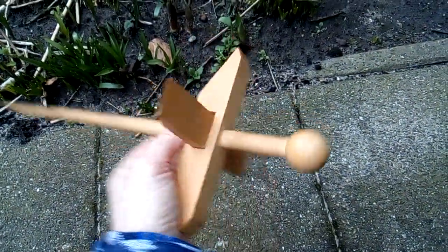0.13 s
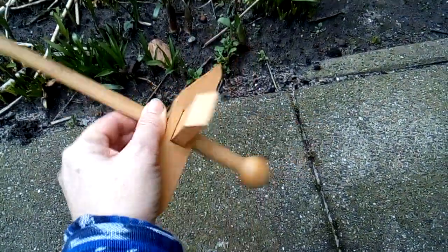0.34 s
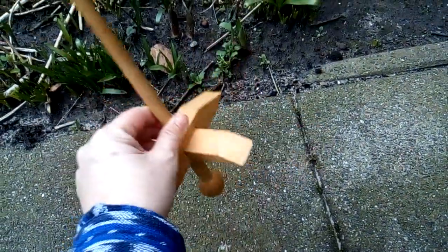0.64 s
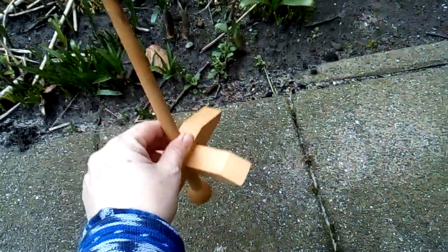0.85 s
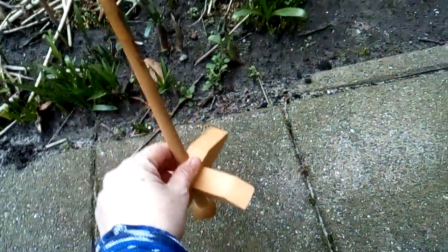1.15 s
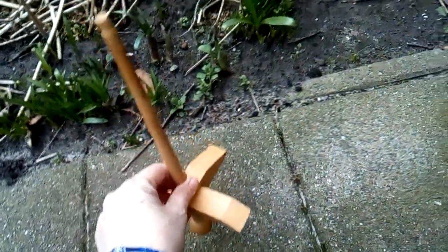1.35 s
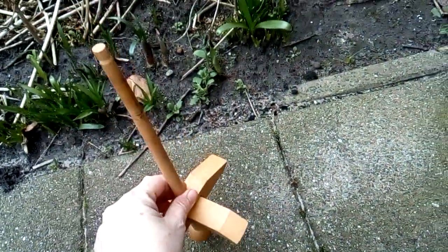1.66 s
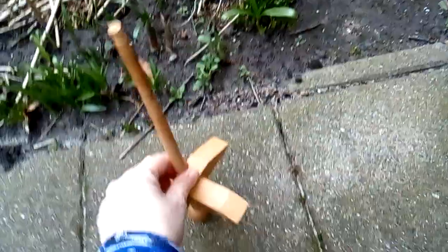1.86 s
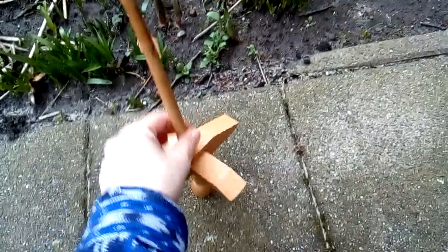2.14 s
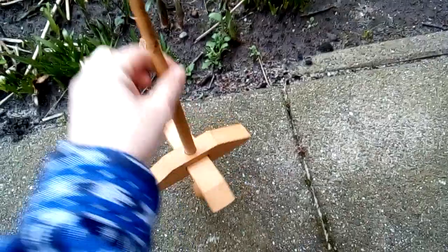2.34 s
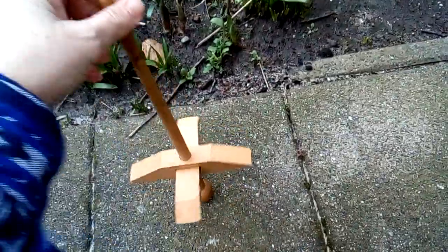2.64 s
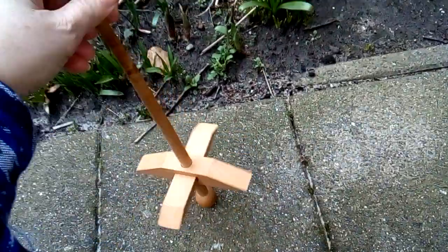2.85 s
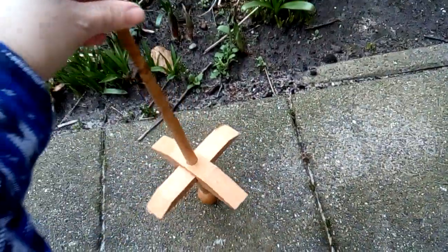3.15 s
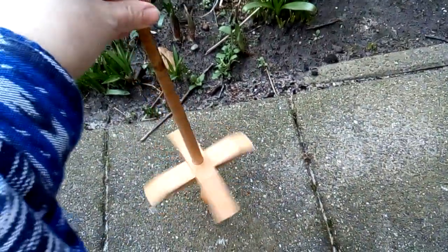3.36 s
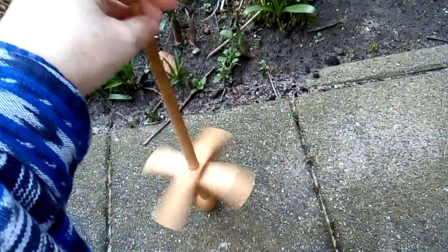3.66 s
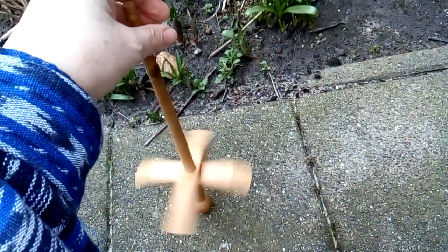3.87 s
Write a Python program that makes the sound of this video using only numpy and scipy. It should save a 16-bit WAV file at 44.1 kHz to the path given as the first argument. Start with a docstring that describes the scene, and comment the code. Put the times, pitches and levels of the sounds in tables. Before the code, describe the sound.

Dry wooden knock on a stone slab, thin finger squeaks after, wind buffeting the microphone

```python
"""Quiet garden air, band-swayed noise, under gusts: two noise bands buffeting the microphone.
At once a far bird whistles, a gliding tone with echoes, and adds two faint peeps.
Near 1.9 s a wooden spindle is set down on a paving slab: decaying modes and grit noise, one small bounce.
Then a hand slides up its shaft and twirls it: filtered friction noise and thin, jittering squeaks.
The gusts are strongest in the last second."""
import sys
import numpy as np
from scipy import signal
from scipy.fft import rfft, irfft
from scipy.io import wavfile
from scipy.ndimage import uniform_filter1d

SR = 44100
rng = np.random.default_rng(int(sys.argv[2]) if len(sys.argv) > 2 else 0)


def put_to_file(sound):
    """Save the sound as 16-bit audio at rate SR, in the file named by the first command-line argument."""
    columns = np.atleast_2d(sound).T  # one column per channel
    safe = np.clip(columns, -1, 1)
    whole_steps = np.round(safe * 32767)
    wavfile.write(sys.argv[1], SR, whole_steps.astype(np.int16))


N = 176400  # samples


def undb(db):
    """Amplitude ratio of a level in dB."""
    return 10 ** (np.asarray(db) / 20)


def unit(x):
    """Scale to rms 1."""
    return x / np.sqrt(np.mean(x ** 2))


def clock():
    """Time of each sample [s]."""
    return np.arange(N) / SR


def curve(table):
    """Each column after the time, joined by straight lines."""
    rows = np.array(table, float).T
    return [np.interp(clock(), rows[0], column) for column in rows[1:]]


def noise(colour):
    """Gaussian noise of rms 1, shaped by a colour table over log frequency."""
    table_hz, table_db = np.array(colour, float).T
    f_hz = np.maximum(np.fft.rfftfreq(N, 1 / SR), 1)
    gain = undb(np.interp(np.log(f_hz), np.log(table_hz), table_db))
    return unit(irfft(rfft(rng.standard_normal(N)) * gain, N))


def wander(rate_hz):
    """Smooth random curve of rms 1: noise under a Gaussian low-pass."""
    steps = N // 32
    f_hz = np.fft.rfftfreq(steps, N / SR / steps)
    slow = irfft(rfft(rng.standard_normal(steps)) * np.exp(-(f_hz / rate_hz) ** 2), steps)
    return np.interp(np.arange(N), np.linspace(0, N, steps), unit(slow))


def fade(t60_s):
    """Exponential decay from time zero, 60 dB in t60_s."""
    return np.exp(-np.log(1000) * clock() / t60_s)


def convolve(x, response):
    """Pass x through an impulse response, cut to N samples."""
    return signal.fftconvolve(x, response)[:N]


STEADY_S, STEADINESS = 0.074, 0.56  # power window; share of its swing removed, in dB


def eddies(colour):
    """Turbulence as coloured noise, its strength partly evened out."""
    x = noise(colour)
    power = uniform_filter1d(np.abs(signal.hilbert(x)) ** 2, int(STEADY_S * SR))
    return unit(x / power ** (STEADINESS / 2))


# gust strength before the trims: (time [s], deep rumble level [dB], flutter level [dB])
GUST_LEVELS = [(0.0, -70.5, -57), (0.058, -59, -64), (0.192, -56, -60.5), (0.218, -68, -68),
               (0.368, -55, -60), (0.496, -64.5, -65), (0.688, -55.5, -60), (0.934, -64, -58),
               (1.106, -59.5, -75), (1.164, -56.5, -59.5), (1.326, -65.5, -66.5), (1.39, -49, -52),
               (1.512, -44, -45), (1.92, -60.5, -59), (1.97, -58, -59), (2.08, -53, -54.5), (2.1, -62, -91),
               (2.13, -54, -87), (2.19, -75, -63), (2.28, -53.5, -77), (2.31, -57, -62.5), (2.57, -59, -57),
               (2.59, -51, -54.5), (2.72, -65, -63.5), (2.78, -53.5, -55.5), (2.9, -54.5, -53),
               (2.94, -39.5, -44.5), (3.08, -42, -52), (3.13, -38, -46.5), (3.18, -40.5, -52),
               (3.21, -52.5, -58.5), (3.29, -39, -50), (3.34, -52.5, -52), (3.39, -41, -60),
               (3.47, -29.5, -52.5), (3.52, -57, -55.5), (3.54, -46.5, -53), (3.58, -42.5, -67),
               (3.61, -56, -60), (3.63, -48, -66), (3.65, -30, -35.5), (3.7, -25.5, -32.5),
               (3.74, -39, -58), (3.8, -38, -58), (3.84, -34, -46), (3.96, -29, -38), (3.97, -46.5, -69),
               (3.99, -23.5, -55)]
# relative spectrum of the large eddies: (frequency [Hz], level [dB])
RUMBLE_COLOUR = [(15, -54.5), (28, -24), (40, -7), (58, -1), (82, 2), (125, -3), (170, -15.5), (260, -41.5),
                 (500, -88)]
# relative spectrum of the smaller eddies: (frequency [Hz], level [dB])
FLUTTER_COLOUR = [(80, -25.5), (160, 3), (215, 0.5), (300, -6.5), (370, -18.5), (460, -38.5), (700, -48.5),
                  (1500, -80)]
RUMBLE_TRIM_DB, FLUTTER_TRIM_DB = 1, 1


def wind():
    """Gusts buffet the microphone with large, deep eddies and smaller, fluttering ones."""
    deep_db, light_db = curve(GUST_LEVELS)
    rumble = eddies(RUMBLE_COLOUR) * undb(deep_db + RUMBLE_TRIM_DB)
    flutter = eddies(FLUTTER_COLOUR) * undb(light_db + FLUTTER_TRIM_DB)
    return rumble + flutter


# relative spectrum of garden air with microphone hiss: (frequency [Hz], level [dB])
AIR_COLOUR = [(30, -15), (150, -6.5), (320, 15.5), (400, 5.5), (480, -0.5), (600, -2), (900, 0.5),
              (1400, -6), (2000, -5.5), (3000, -12.5), (4500, -12.5), (6700, -18), (8000, -26),
              (13500, -26.5), (15300, -20), (16000, -30)]
# strength of the air: (time [s], level [dB])
AIR_LEVELS = [(0, -69), (.8, -69), (1.2, -69), (2.4, -68.5), (4, -71.5)]
SWAY_EDGES_HZ = np.geomspace(250, 6000, num=38)
SWAY_RMS_DB, SWAY_RATE_HZ = 2.1, 9


def air():
    """Outdoor hush: narrow bands swell and fade independently; hiss above 6 kHz does not sway."""
    hush = noise(AIR_COLOUR)
    spectrum, f_hz = rfft(hush), np.fft.rfftfreq(N, 1 / SR)
    for lo_hz, hi_hz in zip(SWAY_EDGES_HZ, SWAY_EDGES_HZ[1:]):
        band = irfft(spectrum * ((f_hz >= lo_hz) & (f_hz < hi_hz)), N)
        sway = unit(undb(SWAY_RMS_DB * wander(SWAY_RATE_HZ)))
        hush = hush + band * (sway - 1)
    return hush * undb(curve(AIR_LEVELS)[0])


SQUEAL_EDGE_S, SQUEAL_FLUTTER_RMS_DB, OCTAVE_DB = 0.014, 4, -22.5


def squeal(start_s, length_s, pitch_hz, level_db, jitter_share):
    """Short tone of jittering pitch and level, with a weak octave."""
    t = clock() - start_s
    # start and length mark the half-gain points
    gate = np.clip(np.minimum(t, length_s - t) / SQUEAL_EDGE_S + .5, 0, 1)
    phase = 2 * np.pi * np.cumsum(pitch_hz * (1 + jitter_share * wander(200))) / SR
    tone = unit(np.sin(phase) + undb(OCTAVE_DB) * np.sin(2 * phase))
    return gate * tone * undb(level_db + SQUEAL_FLUTTER_RMS_DB * wander(99))


# far bird's whistle before jitter: (time [s], pitch [Hz], level [dB])
WHISTLE_TRACK = [(0, 2090, -70), (.055, 2055, -72.5), (.086, 2124, -80.5), (.16, 2225, -68.5),
                 (.26, 2215, -74.5), (.31, 2050, -73.5), (.37, 1926, -78.5), (.43, 1970, -92)]
# bird's faint peeps: (time [s], length [s], pitch [Hz], level [dB], rms pitch jitter [share])
PEEP_TONES = [(0.574, 0.016, 3210, -72.5, 0.015), (.64, 0.12, 2240, -85, 0.011)]
WHISTLE_JITTER_SHARE, WHISTLE_FLUTTER_RMS_DB = .016, 3.8
BIRD_ECHO_DB, BIRD_ECHO_T60_S = -4, 0.45


def bird():
    """A far whistle arches and falls, then two peeps, all blurred by a decaying noise echo."""
    pitch_hz, level_db = curve(WHISTLE_TRACK)
    jittered_hz = pitch_hz * (1 + WHISTLE_JITTER_SHARE * wander(160))
    tone = unit(np.sin(2 * np.pi * np.cumsum(jittered_hz) / SR))
    sounding = clock() < WHISTLE_TRACK[-1][0]
    whistle = tone * undb(level_db + WHISTLE_FLUTTER_RMS_DB * wander(45)) * sounding
    song = whistle + sum(squeal(*row) for row in PEEP_TONES)
    echo = rng.standard_normal(N) * fade(BIRD_ECHO_T60_S)
    return song + undb(BIRD_ECHO_DB) * convolve(song, echo / np.linalg.norm(echo))


# spindle on slab: (time [s], level re first blow [dB], contact decay constant [s])
BLOWS = [(1.9401, 0, .00003), (1.9505, -13, .00005)]
# relative modes of the struck spindle: (frequency [Hz], level [dB], t60 [s])
SPINDLE_MODES = [(343, -5, 0.021), (714, 0, 0.013), (925, 4, 0.01), (1200, -4.5, 0.018),
                 (1540, -8.5, 0.012), (2035, -3, 0.018), (2420, -9.5, 0.015), (2820, -8, 0.02),
                 (3220, -32, 0.052), (3630, -27.5, 0.089), (4230, -41, 0.095), (5900, -14, 0.022),
                 (6680, -32, 0.037), (15100, -10, .009)]
# relative spectrum of grit and yard echo: (frequency [Hz], level [dB])
GRIT_COLOUR = [(30, -33), (150, -1), (380, 7.5), (600, -12), (950, -8), (1500, -11), (2600, -13),
               (4200, -35), (6800, -27), (8000, -46), (16000, -52)]
KNOCK_DB, ATTACK_S = -21.5, .0004
CRACK_DB, CRACK_T60_S = -18, .018  # re KNOCK_DB
YARD_DB, YARD_T60_S = -25, 0.15  # re KNOCK_DB


def knocks():
    """Each blow rings the hand-damped wood, cracks on the grit and echoes faintly in the yard."""
    t, out = clock(), np.zeros(N)
    rise = 1 - np.exp(-(t / ATTACK_S) ** 2)
    ring = np.zeros(N)
    for k, (hz, db, t60_s) in enumerate(SPINDLE_MODES):
        sign = (-1) ** k  # neighbouring modes swing opposite ways
        ring += sign * rise * undb(db) * fade(t60_s) * np.sin(2 * np.pi * hz * t)
    ring = ring / np.abs(ring).max()
    for start_s, db, contact_s in BLOWS:
        push = np.exp(-t / contact_s)
        wood = convolve(ring, push / push.sum())
        decay = undb(CRACK_DB) * fade(CRACK_T60_S) + undb(YARD_DB) * fade(YARD_T60_S)
        grit = rise * noise(GRIT_COLOUR) * decay
        at = int(start_s * SR)
        out[at:] += undb(KNOCK_DB + db) * (wood + grit)[:N - at]
    return out


# relative resonances of the rubbed shaft: (frequency [Hz], half-width at -6 dB [Hz], level [dB])
SHAFT_MODES = [(3135, 130, -4.5), (3760, 190, -11.5), (4870, 110, -4), (5200, 69, -18.5), (5800, 57, 1.5),
               (6920, 330, -6), (8400, 300, -13.5), (9100, 190, -12.5), (12130, 160, -11),
               (14730, 640, -10.5)]
# finger friction before flutter: (time [s], level [dB])
RUB_LEVELS = [(2.1, -100), (2.19, -89), (2.26, -78.5), (2.30, -79.5), (2.36, -69.5), (2.44, -79),
              (2.52, -84), (2.58, -104), (2.77, -101), (2.86, -84), (2.94, -99)]
# grip locked on to one resonance:
# (time [s], length [s], pitch [Hz], level [dB], rms pitch jitter [share])
SQUEAK_TONES = [(2.171, 0.035, 3030, -71.5, 0.0067), (2.201, 0.052, 3064, -71.5, .01),
                (2.26, .028, 3040, -79, 0.0073), (2.261, 0.05, 4860, -76, 0.0085),
                (2.267, 0.095, 5920, -78, .004), (2.325, 0.06, 3030, -66, .022),
                (2.36, 0.184, 5990, -84.5, 0.0063), (2.394, 0.064, 3020, -73, 0.018),
                (2.402, 0.03, 3690, -77, 0.019), (2.446, .087, 3065, -73.5, 0.0065),
                (2.61, 0.057, 3060, -82, .02), (2.62, 0.059, 3980, -83.5, 0.0089),
                (2.827, 0.087, 3040, -84, 0.016), (3.113, 0.065, 3120, -87, 0.011),
                (3.343, 0.036, 2960, -81.5, .01), (3.666, 0.046, 3040, -86, .01),
                (3.747, 0.032, 2990, -84, .01)]
RUB_FLUTTER_RMS_DB = 3.0


def fingers():
    """Sliding skin stirs the shaft's resonances and now and then squeaks on one of them."""
    f_hz = np.fft.rfftfreq(N, 1 / SR)
    body = sum(undb(db) / (1 + 1j * (f_hz - hz) / width_hz) ** 2 for hz, width_hz, db in SHAFT_MODES)
    level_db = RUB_FLUTTER_RMS_DB * wander(90) + curve(RUB_LEVELS)[0]
    friction = rng.standard_normal(N) * undb(level_db)
    slide = irfft(rfft(friction) * unit(np.abs(body)), N)
    return slide + sum(squeal(*row) for row in SQUEAK_TONES)


def scene():
    """Sum of all sources, one channel."""
    return (wind() + air() + bird() + knocks() + fingers())[None]


TOP_HZ = 15650


def record(dry):
    """The recorder cuts the top: steep elliptic low-pass."""
    sos = signal.ellip(10, .2, 70, TOP_HZ, fs=SR, output="sos")  # order, ripple [dB], stop [dB]
    return signal.sosfilt(sos, dry)


dry = scene()
out = record(dry)
put_to_file(out)
```